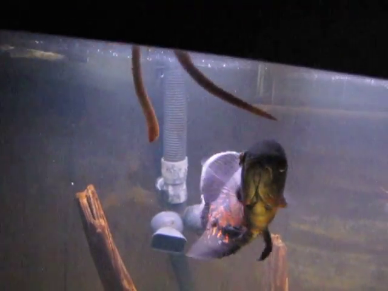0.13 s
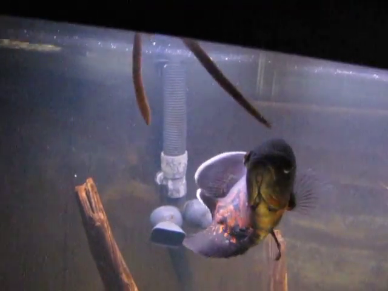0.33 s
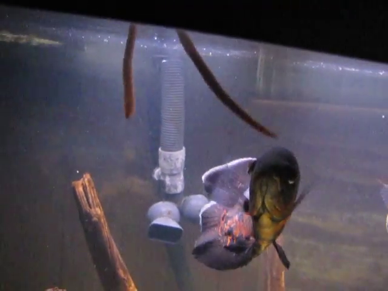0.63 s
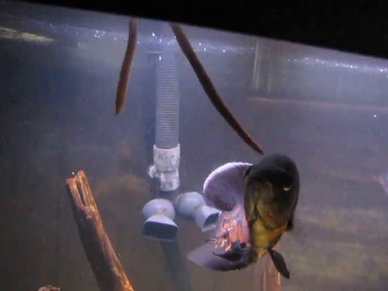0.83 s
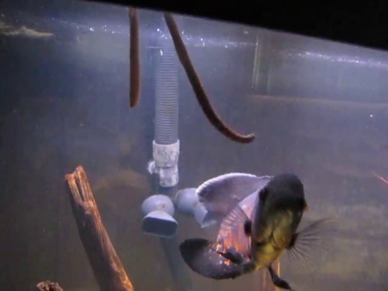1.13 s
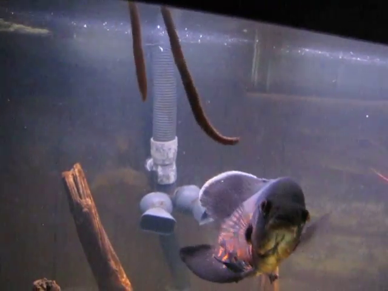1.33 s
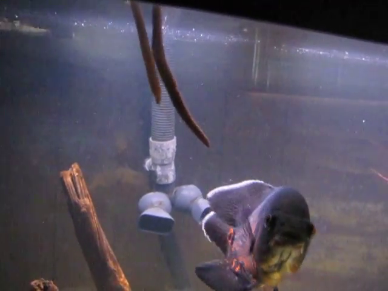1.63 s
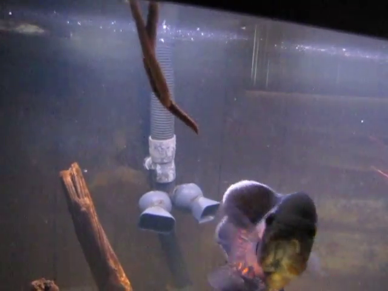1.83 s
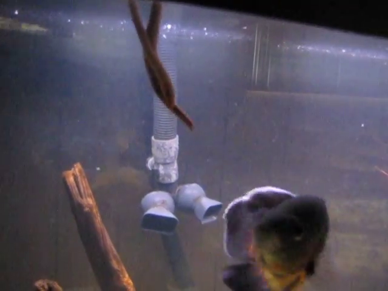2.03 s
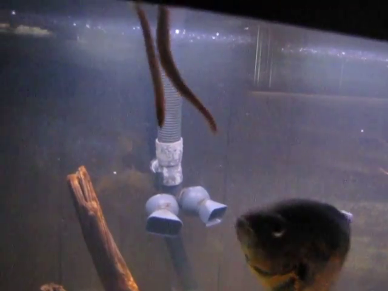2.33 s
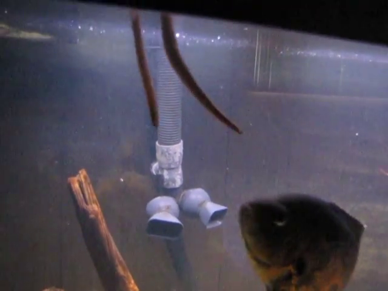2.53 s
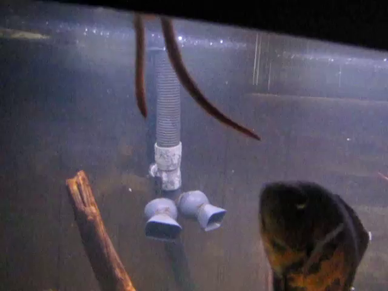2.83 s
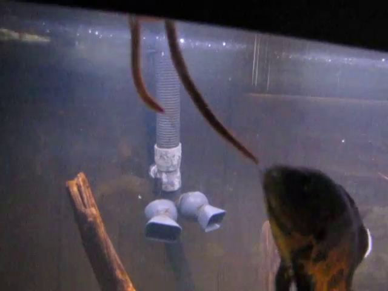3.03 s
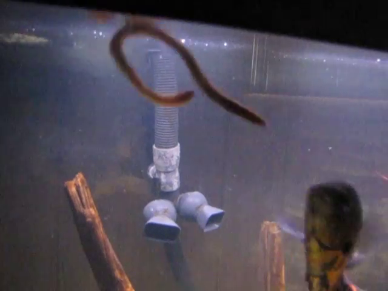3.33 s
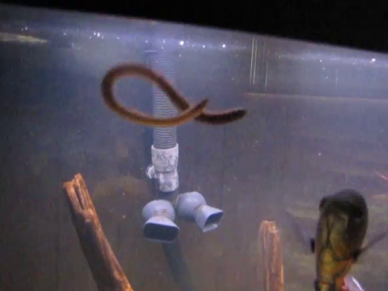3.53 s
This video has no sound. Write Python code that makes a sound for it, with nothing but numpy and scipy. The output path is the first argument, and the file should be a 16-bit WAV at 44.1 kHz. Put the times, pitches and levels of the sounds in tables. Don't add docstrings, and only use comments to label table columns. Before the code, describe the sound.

A fish tank filter pump hums from start to end, about 3.7 seconds, at one even low pitch with mains buzz and a quick, gentle throb, fullest around 1.6 seconds and dipping near 2. Muffled water rushes and gurgles beneath. Tiny bubble ticks fall near 0.1, 0.25, 1.3, 1.4, 3.0, 3.3 and 3.7 seconds, lightly reflected by glass. Quiet room, close stereo microphone, faint hiss.

```python
import sys
import numpy as np
from scipy import signal
from scipy.fft import rfft, irfft
from scipy.io import wavfile
from scipy.ndimage import uniform_filter1d

SR = 44100
rng = np.random.default_rng(int(sys.argv[2]) if len(sys.argv) > 2 else 0)


def volts_from_decibels(level):
    exponent = np.asarray(level, float) / 20
    return 10 ** exponent


def generate_wav(sig):
    pcm = np.round(np.clip(np.atleast_2d(sig).T, -1, 1) * 32767).astype(np.int16)
    wavfile.write(sys.argv[1], SR, pcm)


N = 163170


def evened(x):
    return x / np.sqrt(np.mean(x ** 2) + 1e-20)


def read(points, hz):
    f, value = np.transpose(points)
    return np.interp(np.log(hz + 1), np.log(f + 1), value)


def curve(points):
    s, value = np.transpose(points)
    return uniform_filter1d(np.interp(np.arange(N) / SR, s, value), size=2000)


def slow(top_hz, count):
    drift_rate, length = 500, 4096
    hz = np.fft.rfftfreq(length, 1 / drift_rate)
    lowpass = (hz > 0) / (1 + (hz / top_hz) ** 4)
    drifts = irfft(rfft(rng.standard_normal((count, length))) * lowpass)
    at = np.arange(N) * drift_rate / SR
    return np.array([evened(np.interp(at, np.arange(length), row)) for row in drifts])


def resonate(x, hz, width):
    turn = np.exp(2j * np.pi * hz * np.arange(x.shape[-1]) / SR)
    r = np.exp(-np.pi * width / SR)
    return 2 * (turn * signal.lfilter([1 - r], [1, -r], x / turn)).real


def noise(spectrum, same, patchy_db):
    frames, hz = N // 512 + 5, np.fft.rfftfreq(2048, 1 / SR)
    a, b, c, d, patches = rng.standard_normal((frames, 1025, 5)).T
    patches = uniform_filter1d(patches, size=16, axis=0)
    patches = evened(uniform_filter1d(patches, size=5, axis=1))
    same = np.clip(same(hz), 0, 1)[:, None]
    left = a + 1j * b
    right = same * left + np.sqrt(1 - same ** 2) * (c + 1j * d)
    z = np.array([left, right]) * volts_from_decibels(spectrum(hz)[:, None] + patchy_db * patches)
    return evened(signal.istft(z, nperseg=2048, noverlap=1536)[1][:, :N])


def lean(x, points):
    hz = np.fft.rfftfreq(N, 1 / SR)
    return irfft(rfft(x) * volts_from_decibels(np.array([[.5], [-.5]]) * read(points, hz)), N)


def microphone_hiss():
    # frequency_hz, density_db [dB per Hz]
    hiss_spectrum = [(900, -24.5), (1600, -15), (2500, -7), (4000, -10), (7000, -16), (12000, -22),
                     (15500, -28.5)]
    spectrum = [(200, -12), *hiss_spectrum]
    return volts_from_decibels(-59.5) * noise(lambda hz: read(spectrum, hz), lambda hz: 0 * hz, patchy_db=.3)


def bubbles():
    # start_s, level_db, ring_hz, ring_width_hz, snap_db
    ticks = [(.1052, -41, 11000, 1400, -12), (.251, -46, 12700, 1500, -16), (1.3168, -41, 3300, 1000, -14),
             (1.3172, -42, 5850, 1000, -24), (1.3177, -45.5, 7400, 900, -26),
             (1.4138, -34.5, 7060, 510, -17), (3.0173, -35.5, 3480, 455, -16),
             (3.0184, -43, 6800, 1800, -5), (3.2724, -38, 13700, 1400, -9), (3.2726, -45, 8000, 2800, -2),
             (3.682, -37, 9700, 900, -17)]
    # delay_s, level_db
    echoes = [(.0012, -7), (.0029, -2.5), (.0045, -8), (.0068, -9)]
    # frequency_hz, t60_s
    room = [(3000, .22), (7000, .2), (10000, .09), (14000, .035)]
    room_db, spread, snap_ratio = -26, .25, 2.3
    out, t = np.zeros((2, N + 8000)), np.arange(8000) / SR
    for s, db, hz, width, snap_db in ticks:
        decay = volts_from_decibels(room_db - 60 * t / read(room, hz))
        tail = decay * rng.standard_normal((2, len(t))) * (t > .003)
        taps = np.zeros_like(tail)
        taps[:, 0] = 1
        for delay, echo_db in echoes:
            u, v = rng.uniform(-1, 1, 2)
            at = round((delay + .0004 * u) * SR)
            echo = volts_from_decibels(echo_db) * np.sign(v)
            taps[0, at] += echo
            taps[1, at + round(10 * spread * v)] += echo
        ring = resonate(resonate(taps + tail, hz, 1.5 * width), hz, 1.5 * width)
        ring *= SR / (2 * np.pi * width)
        band = [hz / snap_ratio, min(hz * snap_ratio, SR / 3)]
        snap = signal.lfilter(*signal.butter(2, band, "band", fs=SR), taps + .3 * tail)
        out[:, round(s * SR):][:, :len(t)] += volts_from_decibels(db) * (ring + volts_from_decibels(snap_db) * 2 * snap)
    return out[:, :N]


def gulps():
    rate_per_s, spread_db = 250, 2.5
    chance, size, side = rng.random((N, 3)).T
    knocks = (chance < rate_per_s / SR) * volts_from_decibels(-spread_db * np.log(size + 0.0084)) * np.sign(side - .5)
    balance = np.array([1 + 0.33 * size, 1.4 - 0.64 * size]) / 1.13
    return evened(knocks) * balance


def water():
    # pitch_hz, width_hz, level_db
    housing = [(115, 5.4, -55.5), (168.7, 4, -52.5), (201.4, 11, -50.5), (282.6, 41, -60),
               (306.3, 8, -56.5), (523, 20, -53), (599.3, 51, -48), (635, 19.5, -58.5), (772.6, 63, -56.5),
               (1202, 85, -60), (1267.6, 93, -58.5), (1342, 77, -63), (2653, 42, -72.5), (3133, 17, -78.5)]
    # frequency_hz, density_db [dB per Hz]
    rush = [(12, -17), (25, 0), (70, -3), (250, -0.5), (480, 1), (690, -7), (1000, -10), (2300, -21.5)]
    # frequency_hz, likeness [0-1]
    likeness = [(30, 0.82), (150, 0.93), (600, 1), (1000, 0.69), (1400, 0.75), (2500, 0.14)]
    # frequency_hz, left_minus_right_db
    flow_lean = [(60, -0.4), (200, 2), (700, -0.5), (1300, -1.4), (2400, -5.5)]
    gulp_share, gulp_from_hz = .4, 400
    same = lambda hz: read(likeness, hz)
    flow = noise(lambda hz: 0 * hz, same, patchy_db=0)
    knocked = np.sqrt(1 - gulp_share) * flow + np.sqrt(gulp_share) * gulps()
    gurgle = volts_from_decibels(1.5 * slow(30, count=len(housing)))
    out = np.zeros((2, N))
    for (hz, width, db), g in zip(housing, gurgle):
        drive = g * (knocked if hz > gulp_from_hz else flow)
        ringing = resonate(resonate(drive, hz, 1.28 * width), hz, 1.28 * width)
        out += volts_from_decibels(db) * evened(ringing)
    rush = [*rush, (8000, -62.5)]
    out += volts_from_decibels(-46.5) * noise(lambda hz: read(rush, hz), same, patchy_db=2)
    return lean(out, flow_lean)


def mains_buzz():
    # pitch_hz, level_db
    mains = [(60, -61), (120, -55), (240, -60), (300, -54), (360, -63), (480, -62), (600, -55), (720, -68)]
    t = np.arange(N) / SR
    return sum(volts_from_decibels(db) * np.sin(2 * np.pi * (hz * t + rng.random())) for hz, db in mains)


def bearing_whine(turns):
    shake = 1 + 0.73 * np.cos(2 * np.pi * turns)
    level = volts_from_decibels(-75 + 1.5 * slow(12, count=2))
    side_phase = np.array([[0], [1]])
    return level * shake * np.sin(2 * np.pi * 121 * turns + side_phase)


def rotor_tones(turns, turns_per_s):
    # order [multiple], level_db, wander_db
    orders = [(1, -62, 0), (2, -64.5, 6), (3, -50.5, 2.5), (4, -48, 0.4), (7, -56, 5.5), (10, -54, -5),
              (12, -59.5, 0.5), (13, -64.5, 9), (14, -57, 2.5), (16, -65, 6.5), (6, -66, 0.5)]
    # time_s, level_db
    blade = [(0.0, -38.5), (0.48, -33), (0.64, -36.5), (0.75, -32), (0.85, -37.5), (1.0, -31.5),
             (1.05, -34), (1.54, -32), (1.62, -27.5), (1.93, -36.5), (1.98, -40), (2.05, -36), (2.31, -32),
             (2.84, -34.5), (2.91, -39.5), (2.97, -34.5), (3.55, -36), (3.7, -41)]
    # time_s, level_db
    vane = [(0.0, -52), (0.79, -46.5), (1.19, -65), (1.43, -52), (2.35, -45.5), (2.5, -50), (3.65, -46),
            (3.7, -44)]
    # time_s, order_5_db, order_9_db
    cabinet = [(0.0, -45.5, -71), (0.12, -43.5, -49.5), (0.5, -51.5, -72), (0.64, -53, -38.5),
               (0.99, -56, -49.5), (1.03, -40.5, -39), (1.11, -48, -70), (1.29, -43, -42), (2.47, -43, -48),
               (2.52, -42.5, -41.5), (3.31, -48, -46.5), (3.34, -46, -60), (3.64, -46, -55),
               (3.7, -51, -62)]
    throb_hz, throb_db, throb_peak_s = 4.4, 1.92, 1.62
    wander_hz, lag_rad_per_khz, curl_turns = 5.5, 0.8, -.15
    t = np.arange(N) / SR
    throb = throb_db * np.cos(2 * np.pi * throb_hz * (t - throb_peak_s))
    tones = [(8, curve(blade) + throb), (18, curve(vane))]
    tones += [(5, curve([r[:2] for r in cabinet])), (9, curve([r[::2] for r in cabinet]))]
    for (k, db, wander_db), drift in zip(orders, slow(wander_hz, count=len(orders))):
        tones.append((round(k), db + wander_db * drift))
    lag = np.array([[0], [lag_rad_per_khz / 1000]])
    out = np.zeros((2, N))
    for k, db in tones:
        phase = 2 * np.pi * (k * turns + curl_turns * k ** 2) + lag * k * turns_per_s
        out += volts_from_decibels(db) * np.sin(phase)
    return out


def motor():
    # time_s, speed [turns per s]
    speed = [(0, 21.9), (1.75, 21.9), (1.85, 21.83), (3.7, 21.83)]
    # frequency_hz, left_minus_right_db
    motor_lean = [(60, .5), (100, .1), (150, .6), (175, -.5), (200, -.3), (220, .8), (400, .01)]
    turns = np.cumsum(curve(speed)) / SR
    out = rotor_tones(turns, speed[0][1]) + bearing_whine(turns) + mains_buzz()
    return np.sqrt(2) * lean(out, motor_lean)


def scene():
    return bubbles() + water() + motor()


def top_cut(x):
    return signal.sosfilt(signal.butter(12, 15660, fs=SR, output="sos"), x)


def record(dry):
    edge = signal.firwin(511, 15790, window=("kaiser", 9), fs=SR)
    mix = signal.oaconvolve(dry + microphone_hiss(), edge[None], "same")
    return top_cut(mix)


dry = scene()
out = record(dry)
generate_wav(out)
```